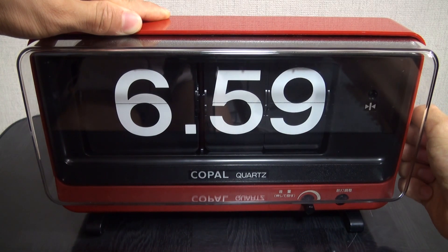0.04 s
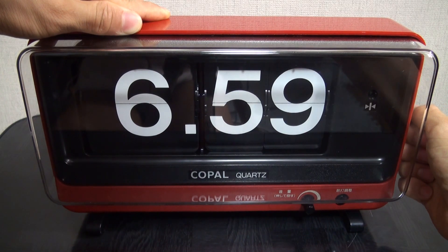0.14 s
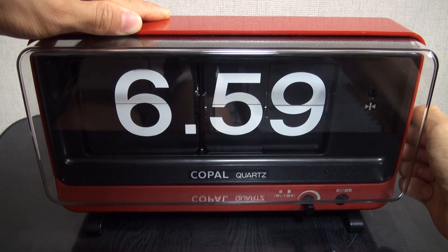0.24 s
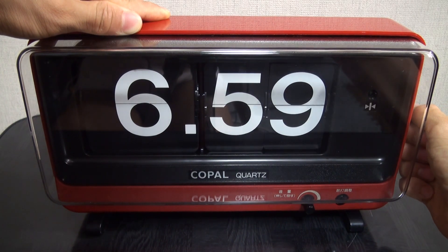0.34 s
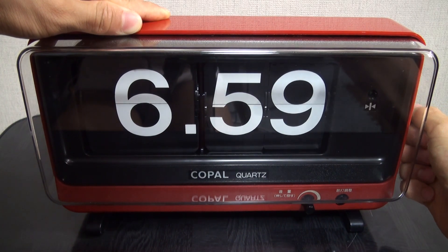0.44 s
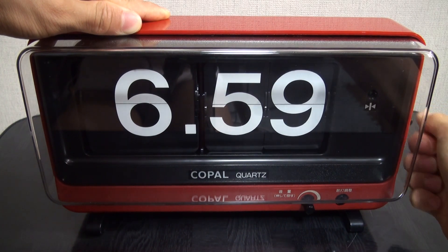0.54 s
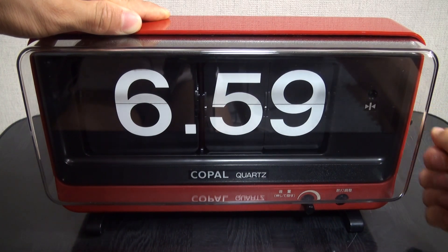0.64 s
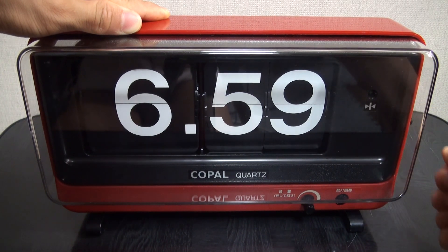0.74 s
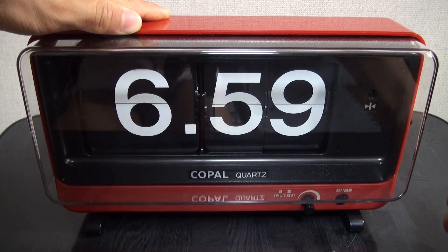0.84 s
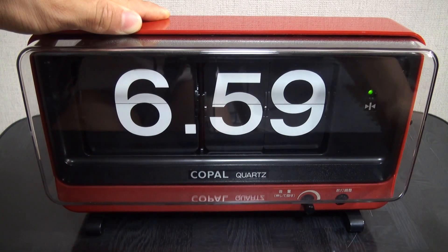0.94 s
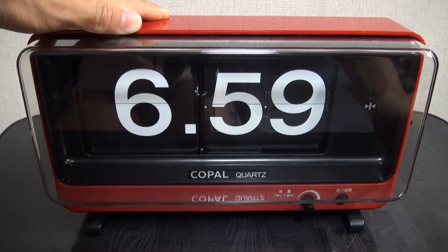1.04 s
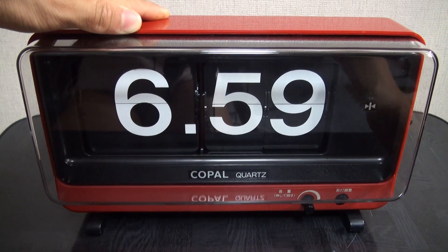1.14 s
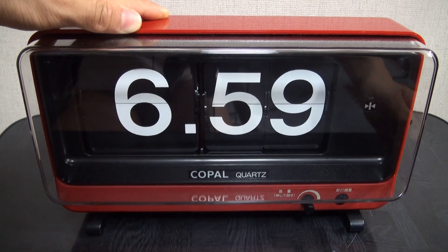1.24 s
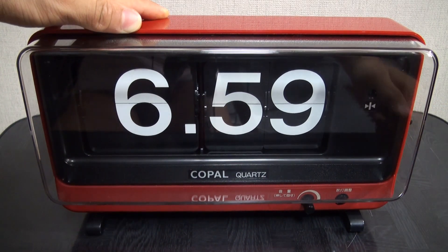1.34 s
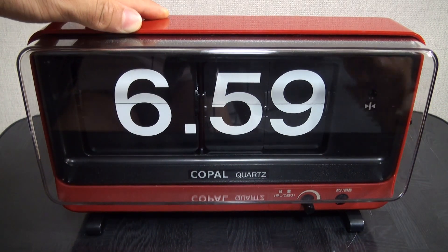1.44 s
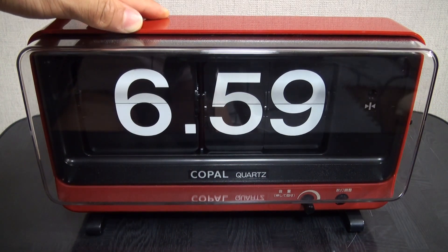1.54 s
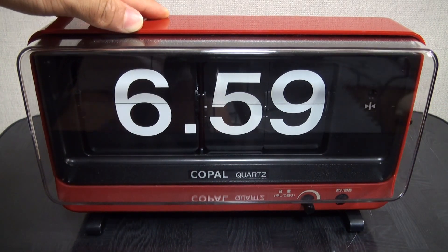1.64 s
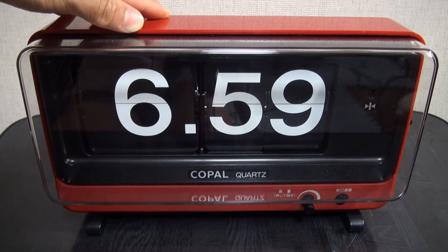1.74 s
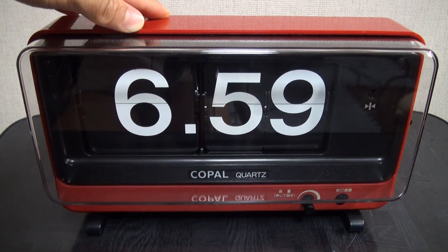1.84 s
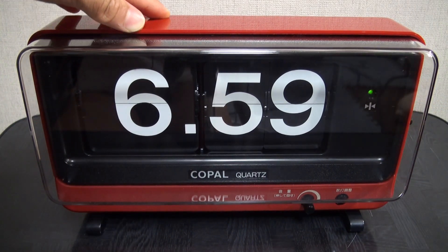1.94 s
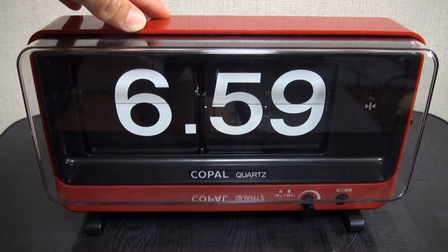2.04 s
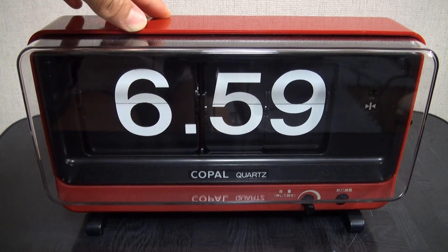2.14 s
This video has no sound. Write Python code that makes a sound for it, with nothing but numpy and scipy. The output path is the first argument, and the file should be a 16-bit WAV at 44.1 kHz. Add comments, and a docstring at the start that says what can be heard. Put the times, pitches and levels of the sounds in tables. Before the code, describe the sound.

A plastic flip clock gives one sharp snap at about 0.2 seconds, with a brief hollow ring from its case. Near 0.5 seconds fingers slip off with a short, dull knock. A dry plastic tick comes just after 1 second, then fainter ones around 1.3 and 1.7 seconds. Everything is close to a stereo microphone in a small, quiet room with a low, steady hum.

```python
"""Setting a flip clock

A plastic flip clock on a table in a small, quiet room, close to a stereo microphone, just set by hand.
The mechanism gives one sharp snap, the case knocks dully as the fingers leave the knob, and the plastic
ticks a few times as the other hand eases off the top. A low room hum lies underneath."""
import sys
import numpy as np
from scipy import signal
from scipy.fft import rfft, irfft
from scipy.io import wavfile
from scipy.ndimage import uniform_filter1d

SR = 44100
rng = np.random.default_rng(int(sys.argv[2]) if len(sys.argv) > 2 else 0)


def materialize(psi):
    """Save the field psi as 16-bit PCM at rate SR to the path in sys.argv[1].

    A 1-D psi becomes a single channel; in a 2-D psi each row is a channel.
    """
    bounded = np.clip(np.atleast_2d(psi).T, -1, 1)
    quanta = np.round(bounded * 32767).astype(np.int16)
    wavfile.write(sys.argv[1], SR, quanta)


N = 97020
TIME = np.arange(N) / SR
HZ = np.maximum(np.fft.rfftfreq(2 * N, 1 / SR), 1)

# Hollow boom of the case. Each row: frequency in Hz, relative level in dB, seconds to fall 60 dB.
CASE_MODES = [(162, -41.5, 0.23), (217.5, -35.5, 0.12), (289.6, -31.5, 0.12), (372.4, -24, 0.045),
              (470.5, -28.5, 0.061)]


def from_db(db):
    """Decibels to gain."""
    return 10 ** (np.asarray(db) / 20)


def at_hz(points, hz=HZ):
    """Read a table on a log-frequency axis."""
    frequencies, values = np.transpose(points)
    return np.interp(np.log(hz), np.log(frequencies), values)


def filtered(x, gain):
    """Causal, minimum-phase filter with the given gain at each frequency."""
    cepstrum = irfft(np.log(gain + 1e-9))
    cepstrum[1:N] *= 2
    cepstrum[N + 1:] = 0
    return irfft(rfft(x, 2 * N) * np.exp(rfft(cepstrum)))[..., :N]


def whitening(x, bins):
    """Gain that gives a noise burst unit energy, spread evenly over frequency."""
    power = np.abs(rfft(x, 2 * N)) ** 2
    return 1 / np.sqrt(np.abs(uniform_filter1d(power, size=bins)) + 1e-12)


def stereo_noise(correlation):
    """Spectra of two white noises with a given correlation at each frequency."""
    mid, side = rfft(rng.standard_normal((2, 2 * N)))
    alike = np.clip(at_hz(correlation), 0, .999)
    return np.sqrt((1 + alike) / 2) * mid + np.sqrt((1 - alike) / 2) * side * [[1], [-1]]


def panned(x, pan):
    """Tip a stereo sound left or right, by frequency."""
    tilt_db = at_hz(pan) / 2
    return np.array([filtered(x[0], from_db(tilt_db)), filtered(x[1], from_db(-tilt_db))])


def decay(age, t60):
    """Full level until age zero, then a fall of 60 dB every t60 seconds."""
    return from_db(-60 * np.maximum(age, 0) / t60)


def blow(start_s, rise_s, t60):
    """Envelope of a blow: a straight rise, then a steady decay."""
    age = TIME - start_s
    return np.clip(age / rise_s, 0, 1) * decay(age - rise_s, t60)


def softness(hz, top_hz):
    """Gain of a soft contact, which leaves out the highs above top_hz."""
    return 1 / np.sqrt(1 + (hz / top_hz) ** 10)


def chatter(envelope, colour, top_hz=np.inf):
    """Plastic parts in contact: countless tiny impacts merge into a stereo noise burst."""
    # Width at the microphone. Each row: frequency in Hz, side level against mid in dB.
    width = [(200, -38), (1500, -13.5), (5000, -13.5), (9000, -19), (14000, -0.5)]
    gain = from_db(at_hz(colour)) * softness(HZ, top_hz)
    mid, side = envelope * rng.standard_normal((2, N))
    mid = filtered(mid, gain * whitening(mid, bins=400))
    side = filtered(side, gain * whitening(side, bins=400) * from_db(at_hz(width)))
    return mid + side * [[1], [-1]]


def ring(peak_s, modes, top_hz=np.inf, swell_s=1 / SR):
    """Decaying modes, struck at once or swelling up to their peak."""
    age = TIME - peak_s
    swell = np.exp(np.minimum(age, 0) / swell_s)
    return swell * sum(from_db(db) * softness(hz, top_hz) * decay(age, t60) * np.sin(2 * np.pi * hz * age)
                       for hz, db, t60 in modes)


def room_tone():
    """Steady room noise with a few humming low resonances."""
    # Noise floor. Each row: frequency in Hz, relative level in dB.
    colour = [(12, -20), (20, 3), (49, -7), (64, -5), (122, 0), (153, -9), (274, 3), (298, -5.5), (362, -4),
              (452, -8.5), (565, -5.5), (614, -8.5), (1130, -9), (1300, -10.5), (1920, -12.5), (2150, -13),
              (15500, -27)]
    # Its stereo image. Each row: frequency in Hz, left-right correlation.
    correlation = [(60, 1), (280, 0.97), (600, 0.51), (1200, 0.05), (5000, 0.039), (12000, 0.48)]
    # Low hum. Each row: centre in Hz, level in dB, width in Hz.
    resonances = [(72.2, -71.5, 36), (124, -76.5, 5.3), (222.4, -64, 34), (275.2, -65, 51)]
    hiss = irfft(stereo_noise(correlation) * from_db(at_hz(colour)))[:, :N]
    out = from_db(-54.5) * hiss / hiss.std()
    for hz, db, width_hz in resonances:
        peak = 1 / (1 + (2 * (HZ - hz) / width_hz) ** 2)
        hum = irfft(rfft(rng.standard_normal(2 * N)) * peak)[:N]
        out = out + from_db(db) * hum / hum.std()
    return out


def room_reverb(x):
    """A small room: an even, diffuse tail that dies at its own rate in each band."""
    # Reverberation time. Each row: frequency in Hz, seconds to fall 60 dB.
    t60s = [(150, 0.39), (530, 0.19), (1400, 0.21), (4000, 0.21), (10000, 0.18), (16000, 0.19)]
    # Colour of the tail. Each row: frequency in Hz, gain in dB.
    colour = [(150, 1.5), (530, -3.5), (1300, -5), (2400, -9), (3600, -7), (5600, -6), (7000, -3.5),
              (10000, -9.5), (13000, -9.5), (15500, -1)]
    # Its stereo image. Each row: frequency in Hz, left-right correlation.
    correlation = [(200, 1), (500, 1), (1500, 0.8), (5000, 0.84), (12000, 0.53)]
    noise, tail = stereo_noise(correlation), 0
    edges = np.geomspace(60, 17000, 15)
    for low, high in zip(edges, edges[1:]):
        band = irfft(noise * ((HZ >= low) & (HZ < high)))[:, :N]
        tail = tail + band * blow(start_s=0.0073, rise_s=0.00107, t60=at_hz(t60s, np.sqrt(low * high)))
    in_range = np.where((HZ > edges[0]) & (HZ < edges[-1]), 1, 1e-3)
    gain = from_db(at_hz(colour)) * whitening(tail.mean(axis=0), bins=200) * in_range
    return signal.fftconvolve(x.mean(axis=0)[None], filtered(tail, gain), axes=1)[:, :N]


def wall_echo(x):
    """The nearest wall returns the low part of each sound to the microphone a moment later."""
    delay_s, top_hz = .0143, 810
    dull = signal.sosfilt(signal.butter(1, top_hz, fs=SR, output="sos"), x.mean(axis=0))
    return from_db(-8.5) * np.interp(TIME - delay_s, TIME, dull, left=0)


def finger_knocks():
    """Fingers slide off: a short rub swells into a dull knock that rings the shell."""
    # Finger contacts. Each row: peak time in seconds, rub gain in dB, swell in seconds,
    # treble limit in Hz, ring gain in dB.
    contacts = [(0.146, -20, 0.0044, 850, -27.5), (0.4215, -22.5, 0.0025, 2520, -32),
                (0.483, -2, 0.0069, 13000, -4)]
    # Colour of the rub. Each row: frequency in Hz, relative level in dB.
    colour = [(100, -2.5), (280, 9), (420, 8.5), (560, 11), (760, 0), (980, 10.5), (1500, 6), (2300, 9.5),
              (3200, -5), (4000, -4), (5500, -13), (11000, -20), (16000, -42)]
    # Ring of the shell. Each row: frequency in Hz, relative level in dB, seconds to fall 60 dB.
    shell_modes = [(268, -40, 0.21), (472.6, -32.5, 0.14), (556, -23, .06), (583, -34, 0.041),
                   (913, -38, 0.19), (1240, -48, 0.045), (2690, -35, .07)]
    # Balance at the microphone. Each row: frequency in Hz, left over right in dB.
    pan = [(500, -0.7), (1300, 2), (2500, 2), (6000, -.6)]
    out = 0
    for peak_s, rub_db, swell_s, top_hz, ring_db in contacts:
        age = TIME - peak_s
        envelope = np.exp(np.minimum(age, 0) / swell_s) * decay(age, t60=0.073)
        rub = from_db(rub_db) * chatter(envelope, colour, top_hz)
        shell = from_db(ring_db) * ring(peak_s, shell_modes, top_hz, swell_s)
        out = out + rub + shell
    return panned(out, pan)


def case_ticks():
    """Strained plastic slips as the hand eases off: a dry tick rings the top panel, then the case booms."""
    # Slips. Each row: start in seconds, tick gain in dB, treble limit in Hz, ring and boom gains in dB.
    slips = [(0.9892, -28.5, 10500, -27, -29), (1.0436, -9.5, 10000, 1.5, -12),
             (1.2755, -24.5, 3120, -10.5, -16.5), (1.359, -29, 1300, -15, -44),
             (1.6550, -24, 1370, -30, -43)]
    # Colour of a tick. Each row: frequency in Hz, relative level in dB.
    colour = [(150, -27), (500, 6), (750, 1), (1200, 9), (1600, -1.5), (2100, 8.5), (2700, 8.5), (3300, 9),
              (3900, -1), (4600, 4.5), (5100, -2), (5600, 11), (6600, 2), (8500, 1), (11000, 3.5),
              (16000, -14)]
    # Ring of the top panel. Each row: frequency in Hz, relative level in dB, seconds to fall 60 dB.
    panel_modes = [(1275, -41.5, 0.064), (1424, -41, 0.044), (1897, -43, 0.061), (2143, -49, .07),
                   (2460, -43, 0.039), (3230, -37, 0.029), (4570, -37, 0.021), (5960, -59, 0.02)]
    rise_s, boom_delay_s = 0.000722, 0.0034
    out = 0
    for start_s, tick_db, top_hz, ring_db, boom_db in slips:
        tick = from_db(tick_db) * chatter(blow(start_s, rise_s, t60=0.052), colour, top_hz)
        panel = from_db(ring_db) * ring(start_s + rise_s, panel_modes, top_hz)
        boom = from_db(boom_db) * ring(start_s + boom_delay_s, CASE_MODES)
        out = out + tick + panel + boom
    return out


def mechanism_snap():
    """The mechanism snaps and rings; a few milliseconds later the case answers and booms."""
    # Colours of the snap and of the case's answer. Each row: frequency in Hz, relative level in dB.
    crack_colour = [(150, -12), (600, 6), (1200, -9.5), (2400, 14.5), (3200, -5), (4200, 9), (4900, -3),
                    (5500, 11.5), (6500, 6.5), (7500, -1), (8700, 6.5), (11000, 4), (12300, 8.5),
                    (13800, 8), (14900, -9), (16000, 6)]
    answer_colour = [(120, -14), (330, -11.5), (500, 13), (750, -2.5), (1200, 13.5), (1800, 7),
                     (2400, 10.5), (3200, 4.5), (4200, 0), (8000, -10), (16000, -7)]
    # Ring of the mechanism. Each row: frequency in Hz, relative level in dB, seconds to fall 60 dB.
    mechanism_modes = [(540, -35, .03), (1084, -47, 0.047), (1282, -29.5, 0.03), (1744, -59, 0.038),
                       (2240, -26, 0.019), (2510, -30, 0.045), (3990, -49, 0.06), (5100, -47, .04),
                       (6140, -32, 0.043), (12130, -30, 0.054), (12200, -37, .05)]
    # Balance at the microphone. Each row: frequency in Hz, left over right in dB.
    pan = [(1000, -0.5), (5000, -0.5), (9000, 0), (13000, -6)]
    start_s, rise_s = .2187, 0.001207
    answer_s = start_s + 0.00406
    crack = from_db(2) * chatter(blow(start_s, rise_s, t60=0.034), crack_colour)
    answer = from_db(-3) * chatter(blow(answer_s, rise_s=0.00033, t60=0.059), answer_colour)
    mechanism = ring(start_s + rise_s, mechanism_modes)
    boom = from_db(-15.5) * ring(answer_s, CASE_MODES)
    return panned(crack + answer + mechanism + boom, pan)


def scene():
    """The clock close to the microphone, with the room's reflections and steady tone behind it."""
    low_cut = signal.butter(2, 108, "high", fs=SR, output="sos")  # the clock's sounds are thinned below about 100 Hz
    snap, ticks, knocks = signal.sosfilt(low_cut, [mechanism_snap(), case_ticks(), finger_knocks()])
    clock = snap + ticks + knocks
    into_room = snap + from_db(-4) * ticks + from_db(-5) * knocks
    return clock + wall_echo(clock) + room_reverb(into_room) + room_tone()


def record(dry):
    """A steep low-pass takes off the highest treble."""
    stop_hz = 16300
    return signal.sosfilt(signal.cheby2(20, 70, stop_hz, fs=SR, output="sos"), dry)


dry = scene()
out = record(dry)
materialize(out)
```